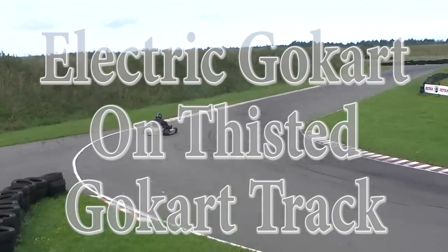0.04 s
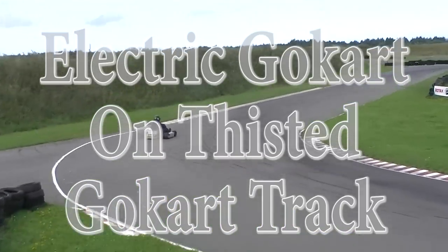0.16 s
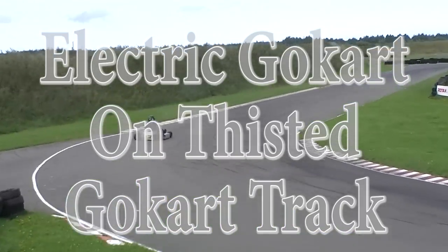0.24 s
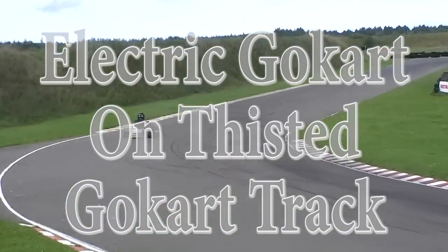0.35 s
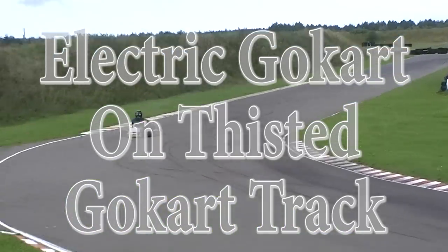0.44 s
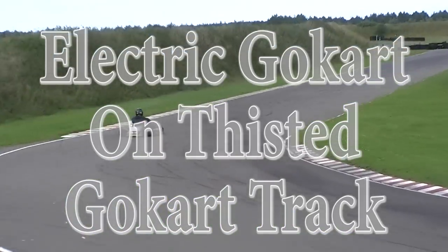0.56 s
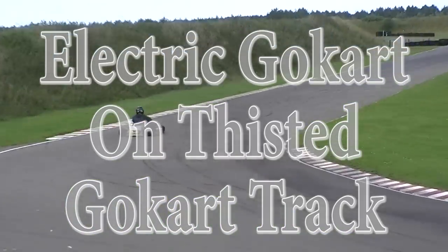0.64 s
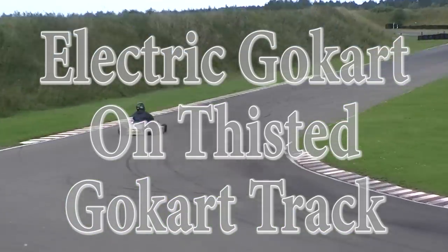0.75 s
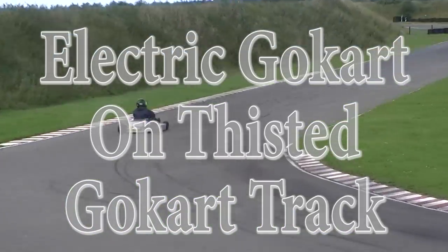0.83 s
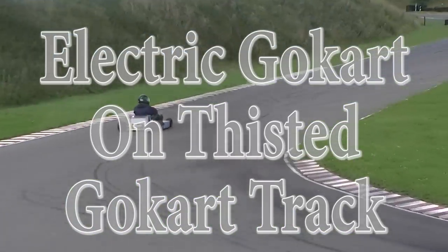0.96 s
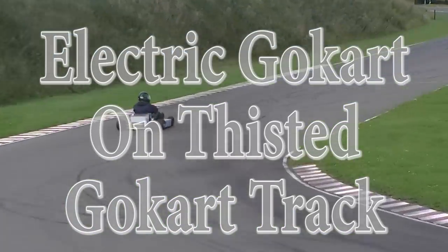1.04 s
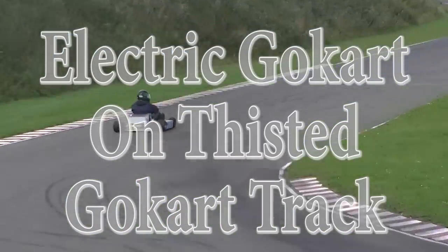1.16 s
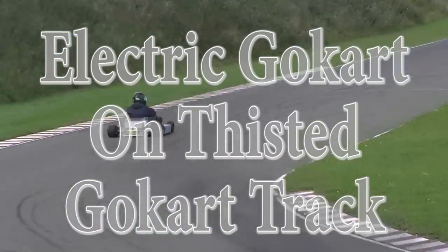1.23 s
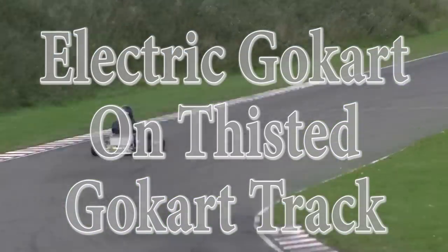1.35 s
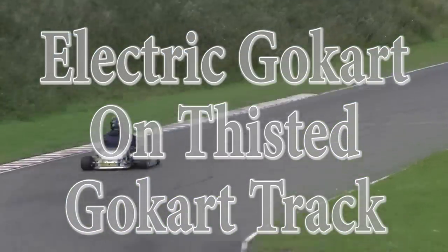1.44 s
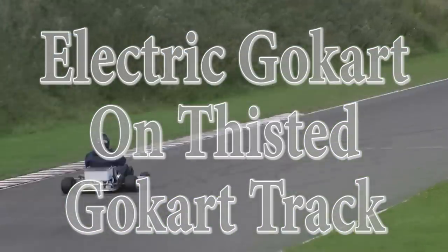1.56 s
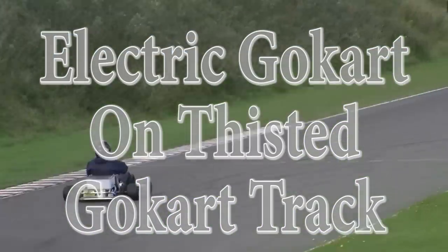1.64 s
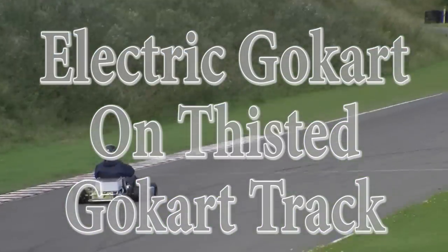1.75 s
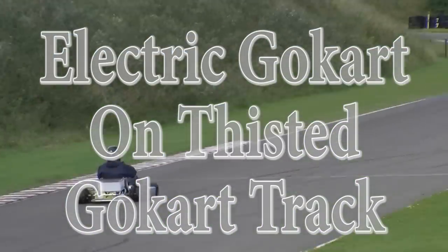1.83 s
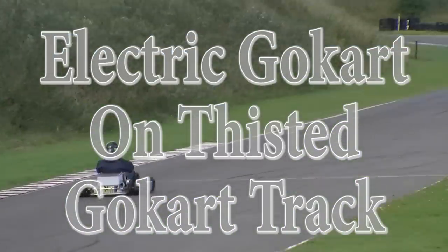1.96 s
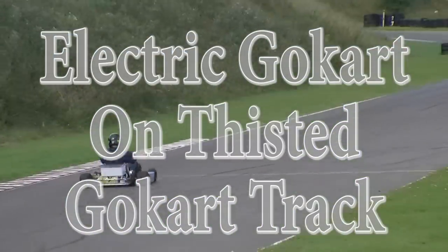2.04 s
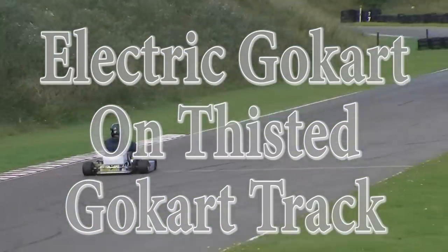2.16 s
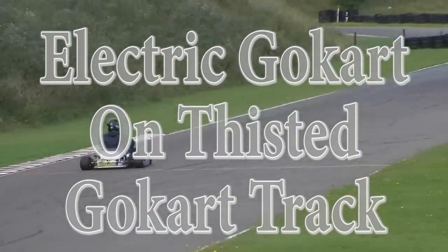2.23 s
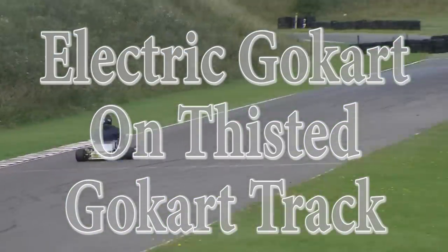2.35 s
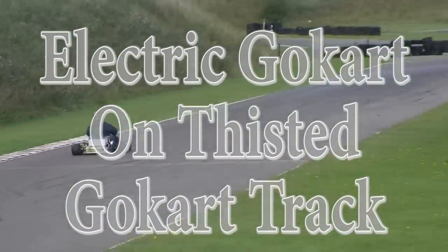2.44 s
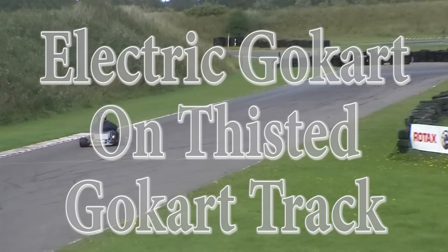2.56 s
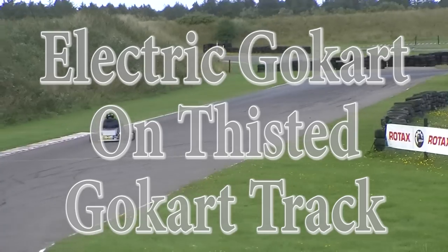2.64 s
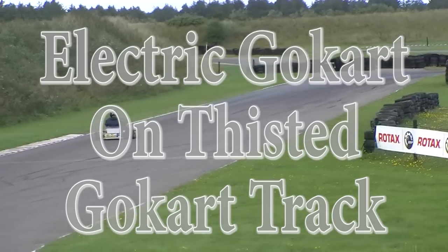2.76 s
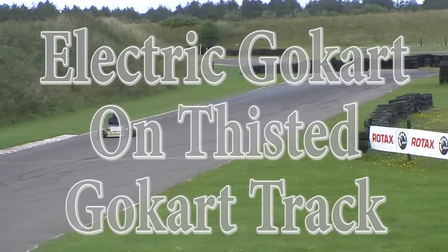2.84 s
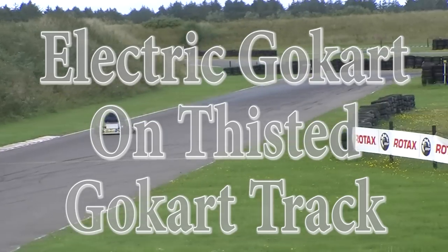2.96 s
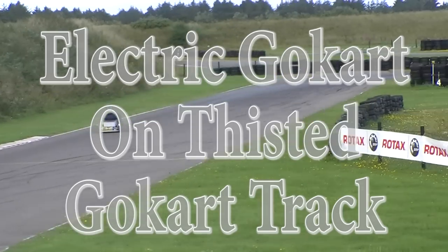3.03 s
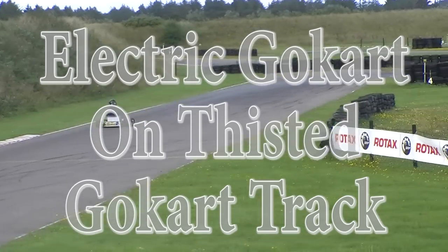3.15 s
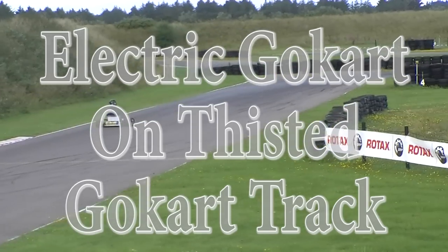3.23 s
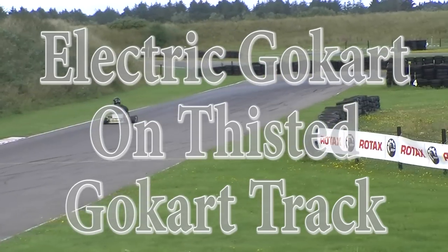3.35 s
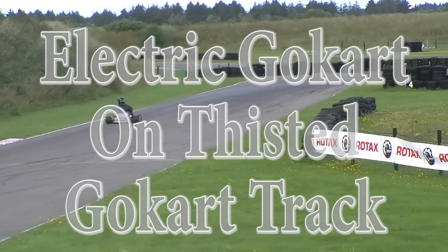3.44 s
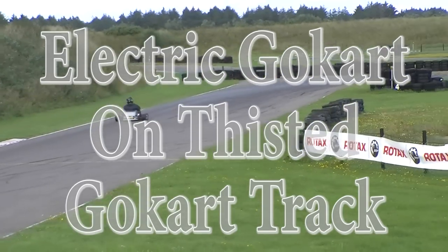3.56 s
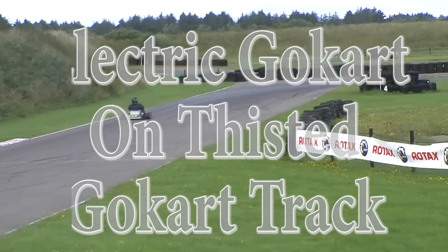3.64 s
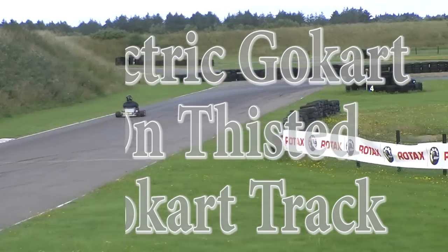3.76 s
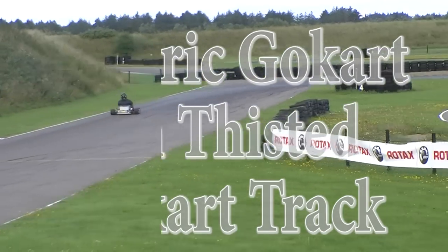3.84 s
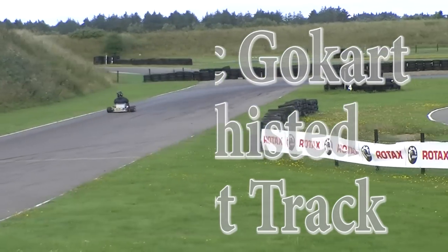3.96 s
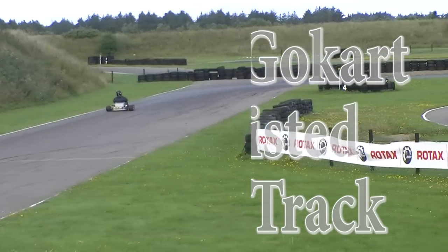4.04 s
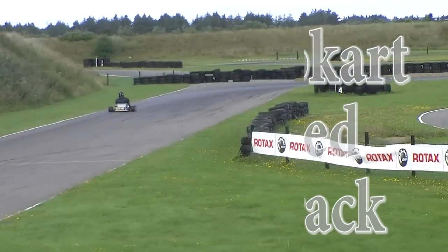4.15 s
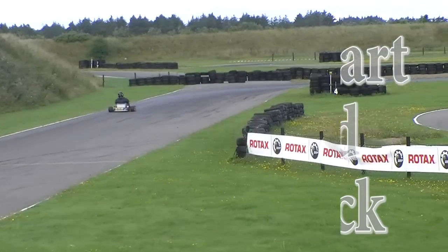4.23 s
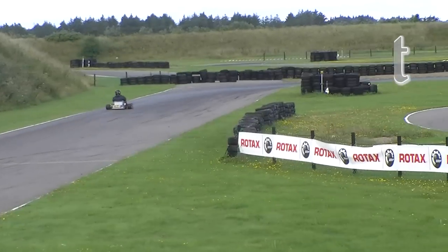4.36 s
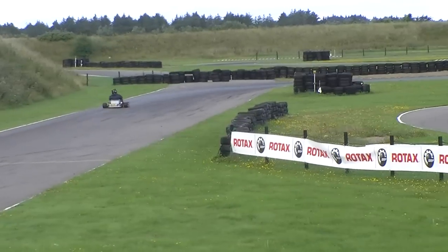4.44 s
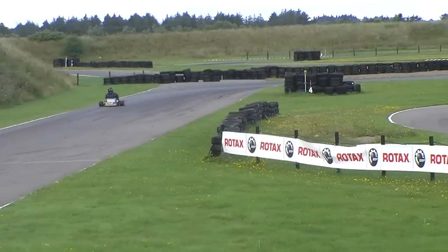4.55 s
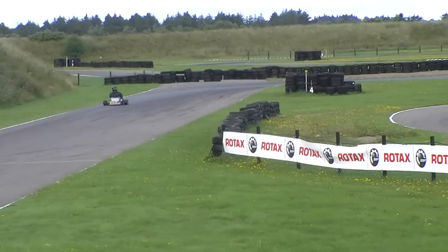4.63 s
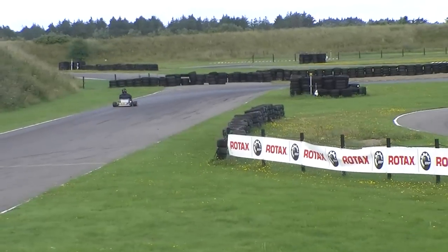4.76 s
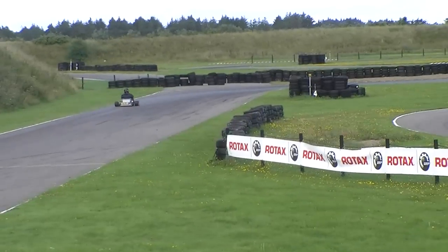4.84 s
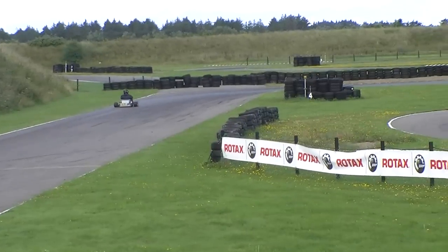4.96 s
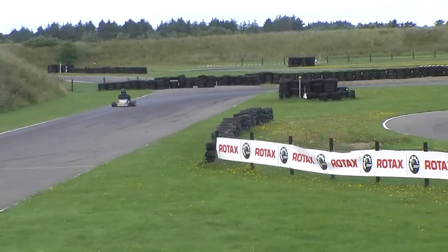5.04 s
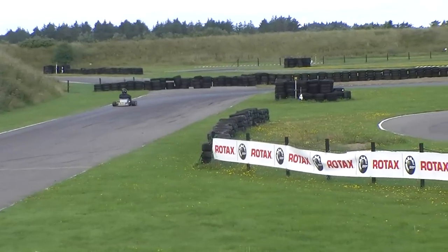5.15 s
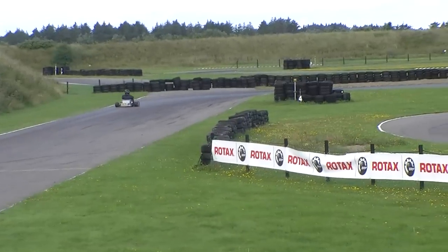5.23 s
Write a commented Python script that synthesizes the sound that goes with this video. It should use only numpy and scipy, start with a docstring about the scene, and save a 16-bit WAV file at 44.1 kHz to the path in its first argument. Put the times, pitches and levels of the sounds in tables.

```python
"""A rising whine over a roar of tyres: an electric go-kart accelerates out of a bend, passes and recedes.
The whine is periodic excitation at the rate at which sprocket teeth meet the chain. Roller impacts
sizzle and ring the links; whine and sizzle drop when the driver lifts off. Rough asphalt drives the
tread and bodywork into broadband vibration. Light gusts touch the microphone, and its plastic
case clicks under the hand."""
import sys
import numpy as np
from scipy import signal
from scipy.fft import rfft, irfft
from scipy.io import wavfile
from scipy.ndimage import uniform_filter1d, map_coordinates

SR = 44100
rng = np.random.default_rng(int(sys.argv[2]) if len(sys.argv) > 2 else 0)


def inscribe(sig):
    """Save sig as 16-bit PCM at rate SR to the path in sys.argv[1].

    A 1-D sig is mono; a 2-D sig holds one channel per row.
    Samples are clipped to [-1, 1] before scaling.
    """
    pcm = np.round(np.clip(np.atleast_2d(sig).T, -1, 1) * 32767)
    wavfile.write(sys.argv[1], SR, pcm.astype(np.int16))


N = 233476
T = np.arange(N) / SR
HZ = np.fft.rfftfreq(N, 1 / SR)

# Noise spectra. Each row: frequency in Hz, relative spectral density in dB.
AIR_SPECTRUM = [(20, -13), (100, -13), (300, 2), (600, 0.5), (1200, -2), (2500, -16.5), (5000, -10),
                (8000, -13.5), (9500, -11.5), (12500, -29), (14000, -50.5)]  # open field and microphone hiss
EDDY_SPECTRUM = [(15, -30), (45, 0.5), (90, 3), (170, 0.5), (270, -7.5), (500, -18), (4000, -95)]
BODY_SPECTRUM = [(40, -52), (190, -23), (228, -4), (280, -16), (390, -13.5), (460, -0.5), (530, 2),
                 (600, 6.5), (690, 0.5), (800, 0.5), (1000, -4.5), (4000, -73)]  # seat and bodywork
ROAR_NEAR_SPECTRUM = [(60, -60), (400, -54), (700, -25), (900, -5), (1050, -6.5), (1230, 3.5), (1450, -2),
                      (1700, 1), (2000, -3), (2280, -10), (7000, -87)]  # tread on asphalt
ROAR_FAR_SPECTRUM = [(60, -56), (750, -26), (880, -8.5), (1200, 0), (1500, -6), (1770, -2), (2050, -7.5),
                     (2300, -14), (7000, -90)]
RASP_SPECTRUM = [(600, -31), (2280, -4), (2620, 2.5), (2850, -2), (3150, -7), (3600, -10.5), (9000, -96)]
SIZZLE_NEAR_SPECTRUM = [(3500, -39), (5400, -11.5), (6500, -9.5), (7500, 0.5), (8500, -1.5), (9700, 1),
                        (11800, -14), (12800, -19), (14800, -39)]  # chain rollers
SIZZLE_FAR_SPECTRUM = [(3500, -42), (5400, -22), (6500, -5.5), (7600, -1.5), (8500, -2), (9400, 0.5),
                       (10300, -6), (11800, -18.5), (13300, -28), (14200, -55)]
LINK_SPECTRUM = [(600, -80), (2900, -2.5), (3400, -4.5), (4100, 0.5), (5000, -2), (6300, -2), (8200, -2.5),
                 (13000, -80)]  # links and sprocket

# Envelopes. Each row: time in seconds, relative level in dB.
BREEZE_LEVEL = [(0, -63.5), (1.2, -53), (2.6, -65.5), (4.3, -71.5), (5.3, -64)]
BODY_LEVEL = [(0, -35.5), (1.2, -38.5), (2.2, -38.5), (2.6, -42.5), (3.1, -44.5), (3.7, -52.5), (4.6, -56),
              (5.3, -56.5)]  # drumming and hum of the bodywork
CHAIN_LEVEL = [(0, -39), (.16, -34), (.33, -36), (.4, -36.5), (.48, -35), (.72, -35), (.82, -40.5),
               (.95, -39.5), (1.1, -35), (1.29, -31), (1.42, -34.5), (1.56, -34), (1.72, -33.5),
               (1.85, -31), (2, -33), (2.15, -37.5), (2.25, -37.5), (2.35, -32.5), (2.46, -33.5),
               (2.52, -34), (2.58, -30.5), (2.68, -30.5), (2.78, -35.5), (2.9, -38.5), (3.2, -43),
               (3.31, -37), (3.5, -43.5), (3.69, -44), (3.77, -51.5), (4.07, -55.5), (4.25, -48),
               (4.35, -50), (4.48, -50.5), (4.65, -57.5), (4.98, -64), (5.2, -58.5)]  # ring and sizzle
FUNDAMENTAL_LEVEL = [(0, -37.5), (.1, -31.5), (.21, -28.5), (.28, -31), (.33, -27.5), (.38, -33),
                     (.45, -27.5), (.515, -36), (.535, -26.5), (.575, -29), (.615, -24.5), (.7, -25.5),
                     (.81, -32), (.865, -22.5), (.9, -19), (.95, -26), (.99, -27), (1.02, -29),
                     (1.125, -32.5), (1.145, -41.5), (1.25, -40), (1.3, -36), (1.47, -34.5), (1.75, -39.5),
                     (1.83, -35), (2.04, -48.5), (2.15, -43), (2.23, -49), (2.28, -42), (2.4, -37.5),
                     (2.6, -43), (2.72, -53), (3.1, -55), (3.27, -41), (3.4, -41.5), (3.66, -42.5),
                     (3.76, -63)]  # the whine at the tooth rate
OCTAVE_LEVEL = [(0, -46), (.5, -52), (.65, -40.5), (.76, -42), (.8, -42), (.93, -36.5), (1.04, -42),
                (1.2, -67), (1.42, -41), (1.8, -43.5), (1.98, -35.5), (2.32, -46.5), (2.48, -38),
                (2.67, -35.5), (2.82, -43), (2.96, -49), (3.22, -40.5), (3.7, -60)]
# Tyre envelopes. Each row: time in seconds, tread level in dB, offset of the rasp in dB.
TYRE_LEVELS = [(0, -38, -18), (.38, -34.5, -6.5), (.9, -37.5, -12), (1.25, -35.5, -7), (1.57, -34.5, -8.5),
               (1.85, -33.5, -3.5), (1.98, -32.5, -5.5), (2.25, -32, -8), (2.41, -32, -5),
               (2.52, -28.5, -3), (2.65, -31.5, -5.5), (2.77, -33.5, -4.5), (2.97, -35, -5),
               (3.27, -32.5, -6.5), (3.52, -38, -1.5), (3.78, -40.5, -4), (3.9, -37, -10),
               (4.08, -40.5, -6), (4.33, -43, 1.5), (4.52, -47.5, -3.5), (4.78, -46.5, -6),
               (4.9, -48.5, -9), (5.2, -55.5, 0)]

# Gusts. Each row: centre in seconds, half width in seconds, level in dB, tilt in dB per octave.
GUST_EVENTS = [(.265, 0.022, -47, -2), (.62, .03, -47, -2), (.912, 0.0082, -42, 2), (.955, 0.016, -34, 3),
               (1.002, 0.01, -35, 2), (1.11, 0.064, -45, -3), (1.403, 0.011, -29, 1),
               (1.448, 0.018, -32, 2), (1.51, .06, -42, -2), (1.74, .025, -42, -1), (2.555, .015, -51, 0),
               (3.365, .025, -46, -3), (3.48, .1, -52, 1), (3.78, 0.021, -50, 2), (3.96, .015, -52, 0),
               (4.92, 0.029, -51, -6), (5.11, 0.067, -39, 1), (5.185, .02, -52, 3)]
# Clicks of the case. Each row: start in seconds, peak in dB.
CASE_CLICKS = [(1.564, -25), (3.601, -30), (3.6138, -18)]
# Modes of the case. Each row: frequency in Hz, relative level in dB, time to fall 60 dB in seconds.
CASE_MODES = [(900, -6, .02), (1270, 0, .012), (1700, -4, .008), (2750, -2, .006)]
# Chassis knocks. Each row: start in seconds, peak in dB, pitch in Hz, width in Hz, length in seconds.
CHASSIS_KNOCKS = [(3.548, -36.5, 580, 150, 0.0077), (4.105, -37, 607, 200, 0.028)]
# Tyre slips. Each row: centre and half width in seconds, pitch and half bandwidth in Hz, level in dB.
TYRE_SCRUBS = [(.06, 0.055, 1234, 90, -35.5), (.12, 0.25, 1590, 100, -44), (.38, 0.14, 1250, 110, -40),
               (2.77, 0.031, 2740, 300, -32.5), (3.79, 0.049, 1550, 220, -41),
               (3.91, 0.075, 2540, 250, -41), (3.93, 0.066, 1150, 160, -47), (4.16, 0.077, 1290, 130, -43),
               (4.27, .11, 2680, 160, -51), (4.65, 0.057, 1200, 90, -48), (4.68, 0.12, 2760, 170, -54),
               (5.2, 0.12, 2650, 170, -56.5)]
# Flares of the rollers' sizzle. Each row: centre in seconds, half width in seconds, gain in dB.
SIZZLE_FLARES = [(.7, 0.034, 4), (1.12, 0.024, 4), (1.24, .04, 0.5), (1.63, 0.032, 1), (1.875, 0.06, 6.5),
                 (2.11, 0.057, 5), (2.42, 0.083, 4.5), (2.609, 0.079, 6.5), (3.39, 0.079, 6.5),
                 (3.83, 0.02, 10.5), (4.47, .015, 9)]

# Resonant peaks and hollows. Each row: centre in Hz, width in Hz, gain in dB.
ROLLER_RESONANCES = [(6430, 250, 5), (6580, 180, -4), (7900, 250, 2), (9480, 120, 3)]
LINK_FRONT_RESONANCES = [(3560, 140, 4.5), (3680, 190, -5.5), (4080, 200, 3), (5130, 79, 11.5),
                         (5570, 200, 4.5), (6480, 220, 6)]
LINK_BACK_RESONANCES = [(3670, 280, 1.7), (4620, 130, 3.5), (4996, 160, 7)]
HOUSING_HOLLOWS = [(6070, 190, -3), (8670, 140, -1.5), (9400, 260, 0)]
# How well the bodywork radiates the hum of the links. Each row: frequency in Hz, gain in dB.
HUM_RADIATION = [(215, -10), (236, -8), (265, -18), (305, -11), (385, -14.5), (420, -4.5), (470, 1.5),
                 (520, 2.5)]
# Swells of higher partials. Each row: multiple of the tooth rate, level in dB, centre and half width in
# seconds.
PARTIAL_SWELLS = [(1.5, -41, 1.7, .15), (1.5, -40, 2.43, 0.26), (1.867, -39, 2.42, .1),
                  (2.667, -43, 0.09, 0.14), (3, -42, 0.29, 0.066), (3, -42.5, 1.14, 0.062),
                  (3, -47, 3.41, .2), (3.267, -46, .22, .06), (4, -44, 1.78, 0.11), (5, -49, 1.38, 0.11),
                  (5, -44, 1.84, 0.28), (5, -40, 2.626, .14), (5, -46.5, 2.95, 0.16),
                  (6, -42, 1.75, 0.094), (6, -49, 1.97, 0.24)]

# Path of the housing's notch. Each row: time in seconds, centre in Hz.
NOTCH_PATH = [(0, 5360), (1.6, 5500), (2.7, 5360), (3.6, 5320), (4.3, 5430)]
# Balance of the microphone ports. Each row: frequency in Hz, left over right in dB.
PORT_BALANCE = [(60, -1), (280, -1), (400, -2), (900, -1.3), (1200, -.2), (2600, -.3), (3400, -3.3),
                (4100, -1.5), (5100, -4.3), (5700, -.2), (7000, -2), (9200, -3), (9900, .8), (14000, 0)]
# Phase between the ports. Each row: frequency in Hz, lead of the left in radians.
PORT_LEAD = [(250, 0), (420, .22), (1000, .13), (1300, 0), (4900, 0), (5350, .24), (5800, 0), (8000, .18),
             (9650, .72), (10900, .55), (11700, .28), (12500, .32), (14600, 0)]

AXLE_TEETH = 44
GONE_BY_S = 2.94


def gain_of(db):
    """Amplitude grows tenfold for every 20 dB."""
    return 10 ** (np.asarray(db) / 20)


def unit_rms(x):
    """Normalisation to a mean power of 1."""
    return x / np.sqrt(np.mean(x ** 2) + 1e-20)


def envelopes(rows):
    """Linear interpolation over time, one curve for each column of values."""
    times, *columns = np.transpose(rows)
    return [np.interp(T, times, column) for column in columns]


def response(rows):
    """Interpolation on a logarithmic frequency axis."""
    hz, values = np.transpose(rows)
    return np.interp(np.log(HZ + 1), np.log(hz + 1), values)


def resonances(rows):
    """Gain of Lorentzian peaks and hollows, summed in decibels."""
    return gain_of(sum(db / (1 + (2 * (HZ - hz) / width) ** 2) for hz, width, db in rows))


def swell(centre_s, half_width_s):
    """A Gaussian envelope of height 1."""
    return np.exp(-((T - centre_s) / half_width_s) ** 2)


def waver(rate_hz):
    """Random modulation: low-passed noise of rms 1."""
    return unit_rms(irfft(rfft(rng.standard_normal(N)) * np.exp(-(HZ / rate_hz) ** 2), N))


def coloured(pair, spectrum, coherence, peaks=1):
    """Source and filter: two independent excitations are mixed to a coherence, then shaped."""
    left, other = rfft(pair)
    right = coherence * left + np.sqrt(1 - coherence ** 2) * other
    return unit_rms(irfft(np.array([left, right]) * gain_of(response(spectrum)) * peaks, N))


def noise(spectrum, coherence):
    """Filtered Gaussian noise, in stereo, of rms 1."""
    return coloured(rng.standard_normal((2, N)), spectrum, coherence)


def turning(front, back, middle_s, length_s):
    """Directivity: an equal-power fade between two colours as the kart shows its back."""
    away = np.clip(.5 + (T - middle_s) / length_s, 0, 1)
    return np.sqrt(1 - away) * front + np.sqrt(away) * back


def scintillation(x, near_db, far_db, bins, frames):
    """Propagation through moving air makes patches of the spectrum swell and fade."""
    _, times, spectra = signal.stft(x, SR, nperseg=1024, noverlap=768)
    patches = rng.standard_normal(spectra.shape[1:])
    for _ in range(2):
        patches = uniform_filter1d(patches, bins, axis=0)
        patches = uniform_filter1d(patches, frames, axis=1)
    depth_db = np.interp(times, [2.5, 4], [near_db, far_db])
    spectra *= gain_of(depth_db * unit_rms(patches))
    return signal.istft(spectra, SR, nperseg=1024, noverlap=768)[1][:, :N]


def housing_notch(x, depth_db=-7.5, width_hz=260):
    """Destructive interference at the housing weakens a band that moves with the kart's direction."""
    hz, times, spectra = signal.stft(x, SR, nperseg=1024, noverlap=768)
    centre_hz = np.interp(times, *np.transpose(NOTCH_PATH))
    detuning = 2 * (hz[:, None] - centre_hz) / width_hz
    spectra *= gain_of(depth_db / (1 + detuning ** 2))
    return signal.istft(spectra, SR, nperseg=1024, noverlap=768)[1][:, :N]


def air():
    """The open field and the microphones' hiss form a stationary noise floor."""
    return gain_of(-51.5) * noise(AIR_SPECTRUM, coherence=.5)


def wind(breeze_lumps_db=4, gust_lumps_db=1.5, pivot_hz=110):
    """Turbulence: low eddies push the two microphones in opposition; sharp buffets reach higher."""
    eddies = noise(EDDY_SPECTRUM, coherence=-.85)
    out = gain_of(envelopes(BREEZE_LEVEL)[0] + breeze_lumps_db * waver(30)) * eddies
    spectrum = rfft(eddies)
    lumps = gain_of(gust_lumps_db * waver(30))
    octaves = np.log2(np.clip(HZ / pivot_hz, 1 / 4, 4))
    for centre_s, half_width_s, db, tilt_db in GUST_EVENTS:
        shape = swell(centre_s, half_width_s)
        gust = shape * lumps * irfft(spectrum * gain_of(tilt_db * octaves), N)
        out += gain_of(db) * unit_rms(gust) * np.sqrt(np.mean(shape ** 2))
    return out


def case_clicks(attack_s=.00041):
    """Free vibration: the damped modes of the case reach each microphone with their own phase."""
    out = np.zeros((2, N))
    for start_s, db in CASE_CLICKS:
        age = np.maximum(T - start_s, 0)
        ring = np.zeros((2, N))
        for hz, mode_db, t60 in CASE_MODES:
            phase = rng.uniform(-1.2, 1.5, (2, 1))
            ring += gain_of(mode_db - 60 * age / t60) * np.sin(2 * np.pi * hz * age + phase)
        ring *= np.minimum(age / attack_s, 1)
        out += gain_of(db) * ring / abs(ring).max()
    return out


def chassis_knocks():
    """Impact excitation: each bump sends a short rattle through one broad chassis resonance."""
    out = np.zeros(N)
    for start_s, db, hz, width_hz, length_s in CHASSIS_KNOCKS:
        progress = np.maximum(T - start_s, 0) / length_s
        burst = progress * np.exp(-2 * progress) * rng.standard_normal(N)
        resonance = 1 / (1 + 2j * (HZ - hz) / width_hz)
        ring = irfft(rfft(burst) * resonance ** 2 * HZ / (HZ + hz), N)
        out += gain_of(db) * ring / abs(ring).max()
    return out


def tyre_scrubs():
    """Friction drives a narrow, hollow resonance for a moment as the tread slips."""
    out = np.zeros(N)
    for centre_s, half_width_s, hz, half_band_hz, db in TYRE_SCRUBS:
        resonance = 1 / (1 + 1j * (HZ - hz) / half_band_hz)
        band = irfft(rfft(rng.standard_normal(N)) * resonance ** 2, N)
        out += gain_of(db) * swell(centre_s, half_width_s) * unit_rms(band)
    return out


def tyres(roar_db=-1, grain_db=.5):
    """Random forcing by coarse asphalt makes the tread roar and rasp and the bodywork drum."""
    tread_db, rasp_db = envelopes(TYRE_LEVELS)
    near, far = noise(ROAR_NEAR_SPECTRUM, 1), noise(ROAR_FAR_SPECTRUM, .98)
    roar = turning(near, far, middle_s=3.62, length_s=1.2)
    rasp = turning(noise(RASP_SPECTRUM, 1), noise(RASP_SPECTRUM, .98), middle_s=2.85, length_s=1.1)
    tread = gain_of(tread_db) * (gain_of(roar_db) * roar + gain_of(rasp_db) * rasp)
    drumming = gain_of(envelopes(BODY_LEVEL)[0]) * noise(BODY_SPECTRUM, .98)
    return (tread + drumming) * gain_of(grain_db * waver(49))


def slack(lift_s=3.71, length_s=.079):
    """Loss of chain tension: 0 while the motor pulls, 1 once the driver has lifted off."""
    return np.clip(.5 + (T - lift_s) / length_s, 0, 1)


def tooth_rate(start_hz=436.5, climb_hz_per_s=193.9, top_hz=1154.3, knee=3.276):
    """Meshing frequency follows speed: it climbs, levels off and sags as the chain slackens."""
    climb = climb_hz_per_s * T
    hz = start_hz + climb / (1 + (climb / (top_hz - start_hz)) ** knee) ** (1 / knee)
    tremble = 1 + .0011 * waver(18)  # play in the chain
    return hz * (1 - .04 * slack()) * tremble


def drifting(x, sag=.018):
    """Stretching time lowers pitch: the chain's resonances waver and sink as the kart goes by."""
    speed = 1 - sag * np.minimum(T / GONE_BY_S, 1) + .004 * waver(4)
    return np.array([map_coordinates(side, [np.cumsum(speed)], order=3, mode="mirror") for side in x])


def chain(teeth, decay_teeth=.58, flutter_db=.9, slack_db=-10.5, dulling_db_per_s=5):
    """Uneven roller impacts over steady rubbing excite the resonances of rollers, links and sprocket."""
    force_db = -rng.standard_normal(N)[teeth.astype(int)]  # one draw for each tooth
    strikes = 2 * gain_of(force_db) * np.exp(-(teeth % 1) / decay_teeth)
    tension = gain_of(flutter_db * waver(31))

    def struck(spectrum, peaks, rubbing):
        excitation = (rubbing + strikes) * tension * rng.standard_normal((2, N))
        return drifting(coloured(excitation, spectrum, coherence=.98, peaks=resonances(peaks)))

    near = struck(SIZZLE_NEAR_SPECTRUM, ROLLER_RESONANCES, rubbing=.87)
    far = struck(SIZZLE_FAR_SPECTRUM, ROLLER_RESONANCES, rubbing=.87)
    sizzle = turning(near, far, middle_s=2.52, length_s=.55)
    # A flare makes the sizzle brighter as well as louder.
    flare_db = sum(db * swell(centre_s, half_width_s) for centre_s, half_width_s, db in SIZZLE_FLARES)
    fizz = irfft(rfft(sizzle) * np.interp(HZ, [10000, 11500], [0, 1]), N)
    sizzle += fizz * (gain_of(.57 * flare_db - 1.5) - 1)
    absorption_db = dulling_db_per_s * np.maximum(T - GONE_BY_S, 0)  # air swallows the sizzle
    sizzle *= gain_of(5.5 + flare_db + slack_db * slack() - absorption_db)
    front = struck(LINK_SPECTRUM, LINK_FRONT_RESONANCES, rubbing=2.1)
    back = struck(LINK_SPECTRUM, LINK_BACK_RESONANCES, rubbing=2.1)
    ring = gain_of(1.2) * turning(front, back, middle_s=1.69, length_s=1.46)
    return gain_of(envelopes(CHAIN_LEVEL)[0]) * (sizzle + ring)


def whine(tooth_hz, teeth, slack_db=-16, throb_depth=.14):
    """Periodic meshing gives partials locked to the sprocket; road shake modulates and broadens them."""
    scatter = np.interp(T, [1, 2], [.11, .21])
    lash = np.interp(T, [1, 2], [.015, .045]) * waver(22)  # play of the chain, in teeth

    def partial(multiple, db):
        shake = 1 + scatter * max(multiple, 1) ** .7 * (waver(49) + 1j * waver(40))
        cycles = multiple * (teeth + lash) + rng.random()
        return np.sqrt(2) * gain_of(db) * (shake * np.exp(2j * np.pi * cycles)).real

    tone = partial(1, envelopes(FUNDAMENTAL_LEVEL)[0]) + partial(2, envelopes(OCTAVE_LEVEL)[0])
    # Inner and outer links alternate: a hum at half the rate, radiated by the bodywork.
    radiation_db = np.interp(tooth_hz / 2, HZ, response(HUM_RADIATION))
    tone += partial(.5, envelopes(BODY_LEVEL)[0] - 8.5 + radiation_db)
    # Higher partials swell briefly: most are beamed narrowly, so they come and go as the kart turns; the third
    # swells near 1.14 s as it passes a resonance of the housing near 2 kHz.
    for multiple, db, centre_s, half_width_s in PARTIAL_SWELLS:
        tone += swell(centre_s, half_width_s) * partial(multiple, db + waver(3.8))
    throb = 1 + throb_depth * np.cos(2 * np.pi * 2 * teeth / AXLE_TEETH)  # twice per axle turn
    return gain_of(slack_db * slack()) * tone * throb


def scene():
    """Superposition of the kart, the wind, the clicks and the noise floor."""
    tooth_hz = tooth_rate()
    teeth = np.cumsum(tooth_hz) / SR
    links = scintillation(chain(teeth), near_db=1.9, far_db=1.9, bins=3, frames=18)
    kart = whine(tooth_hz, teeth)
    kart = kart + scintillation(links + tyres(), near_db=1, far_db=2, bins=19, frames=26)
    return kart + tyre_scrubs() + chassis_knocks() + wind() + case_clicks() + air()


def record(dry):
    """Linear filtering: the housing's colour, the level and phase of two ports, then a band limit."""
    port = gain_of(response(PORT_BALANCE) / 2) * np.exp(1j * response(PORT_LEAD) / 2)
    spectrum = rfft(housing_notch(dry)) * resonances(HOUSING_HOLLOWS)
    heard = irfft(spectrum * np.array([port, 1 / port]), N)
    low_pass = signal.firwin(511, 14900, window=("kaiser", 9), fs=SR)
    return signal.oaconvolve(heard, low_pass[None], "same")


dry = scene()
out = record(dry)
inscribe(out)
```